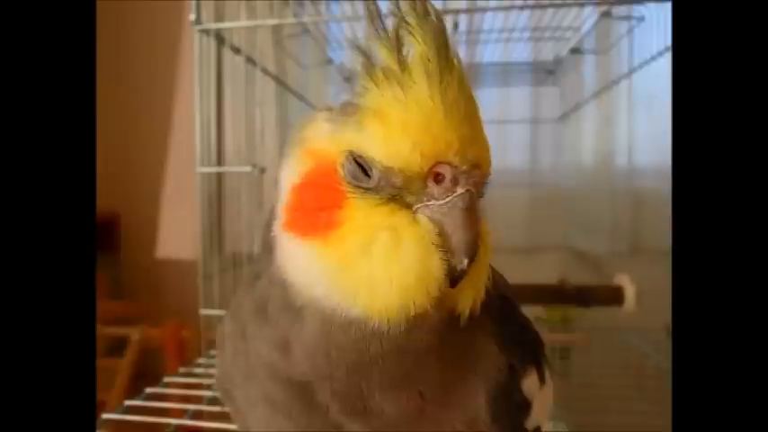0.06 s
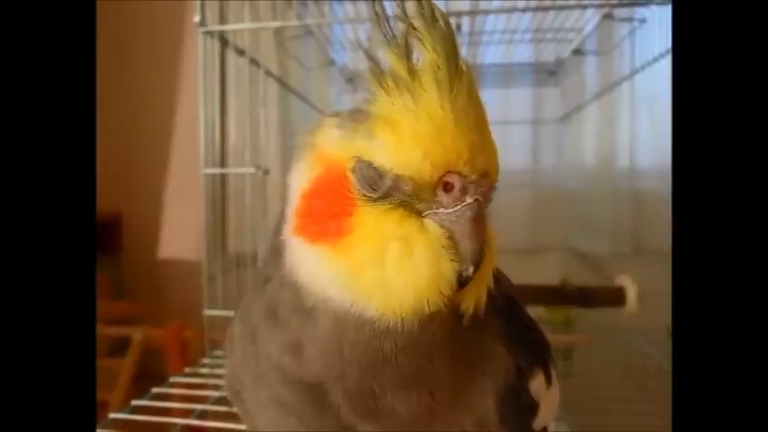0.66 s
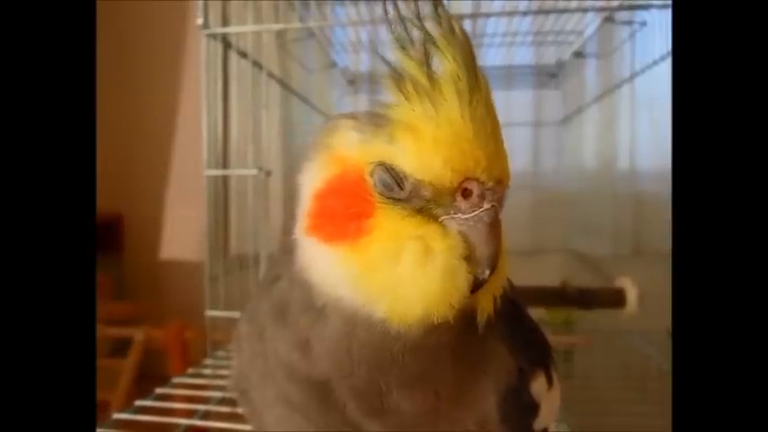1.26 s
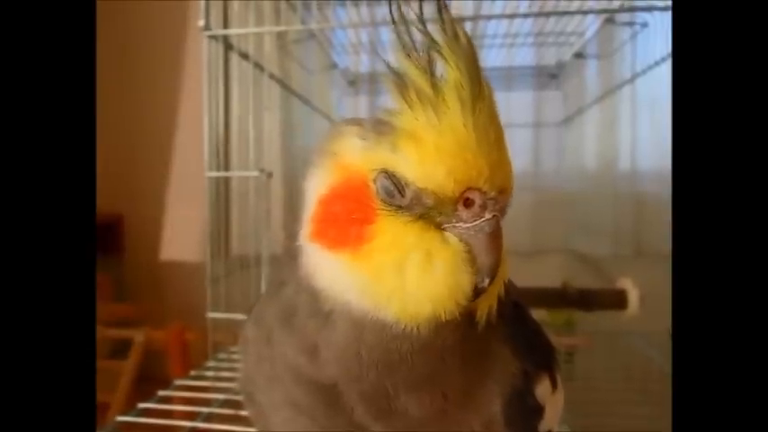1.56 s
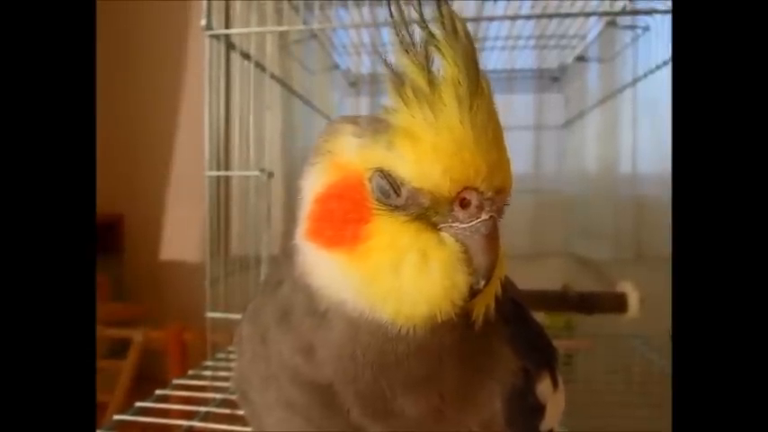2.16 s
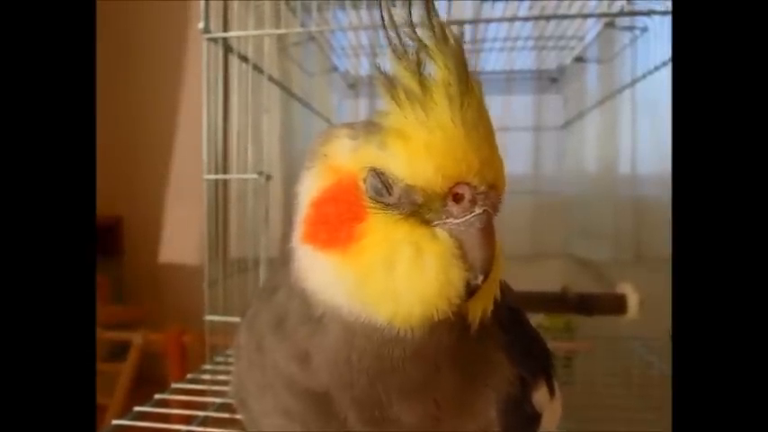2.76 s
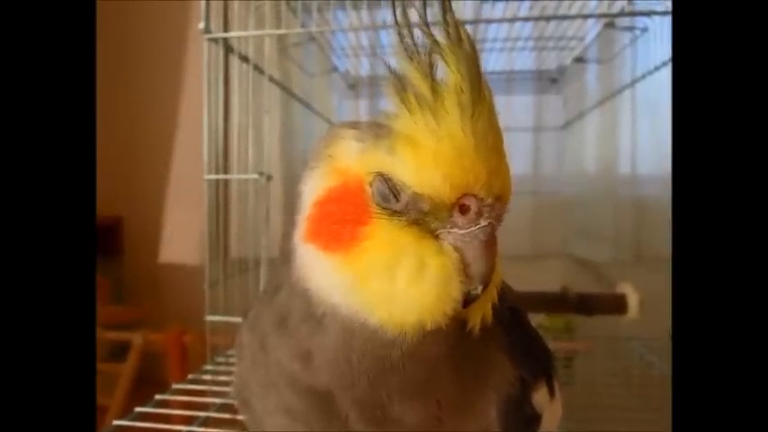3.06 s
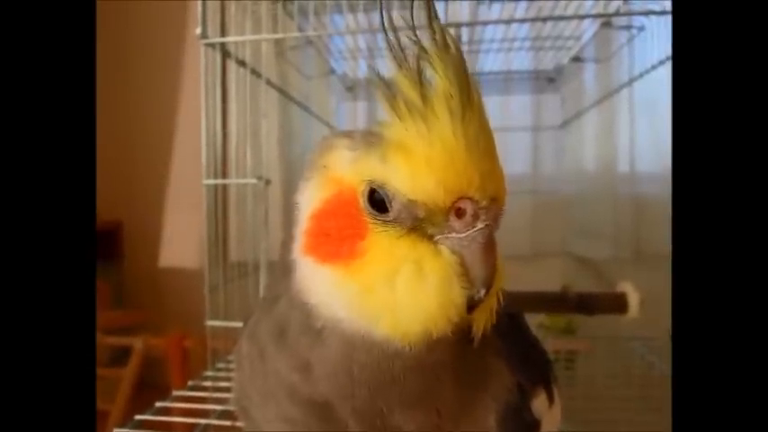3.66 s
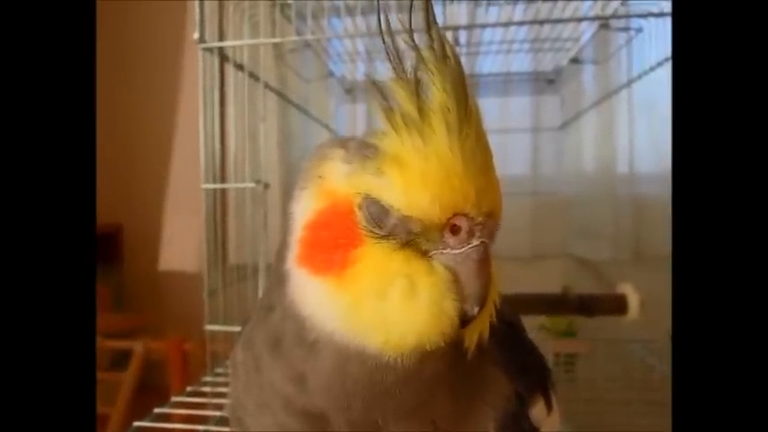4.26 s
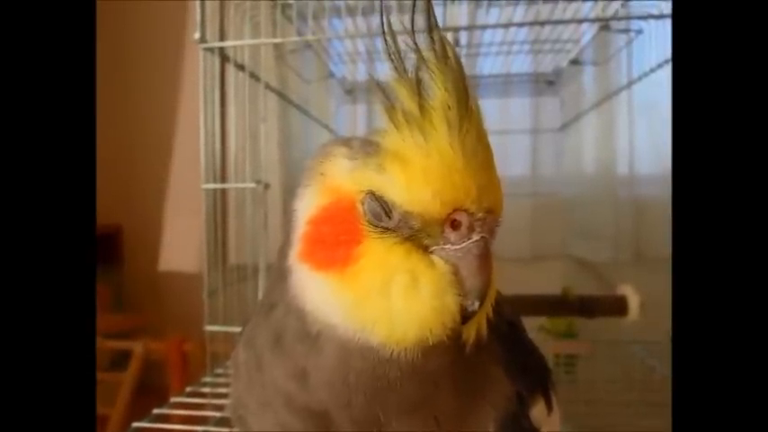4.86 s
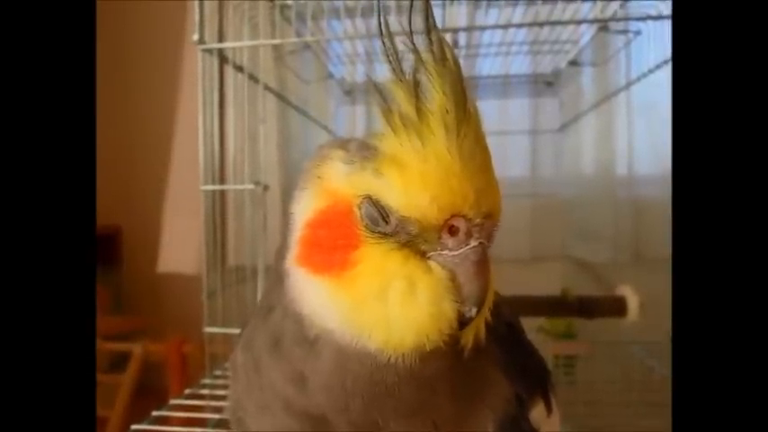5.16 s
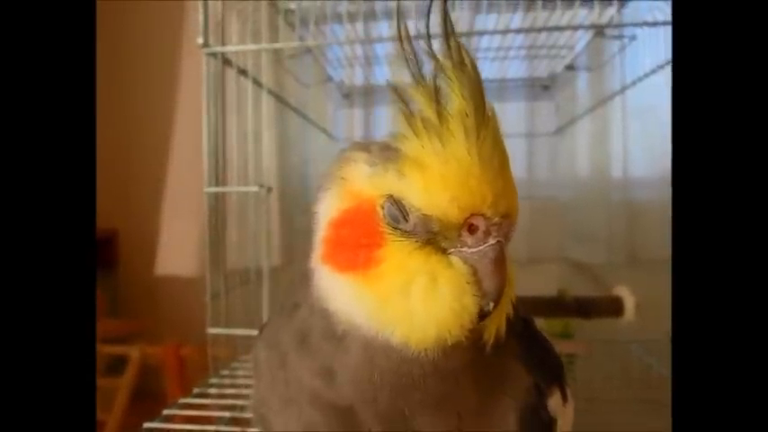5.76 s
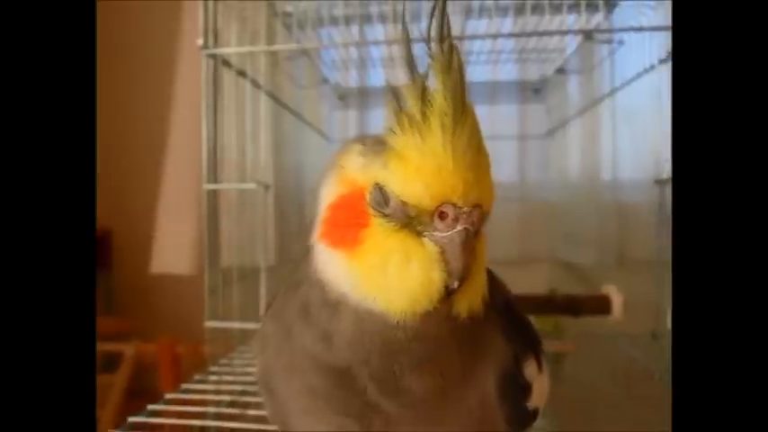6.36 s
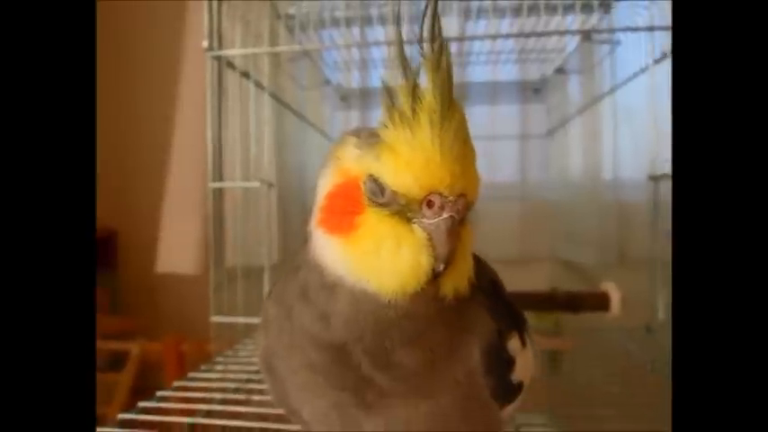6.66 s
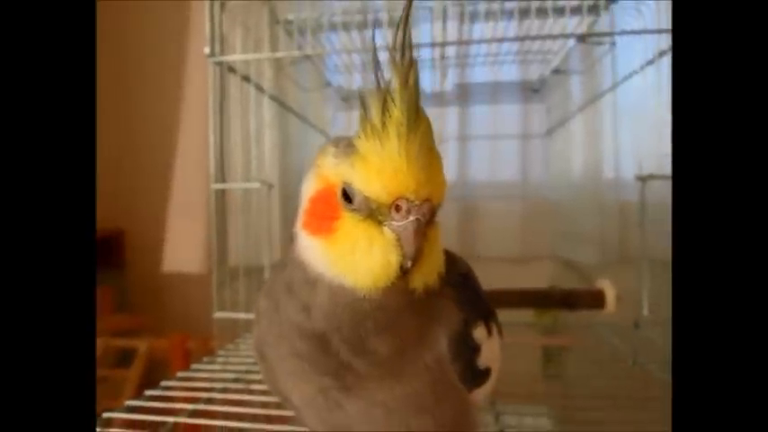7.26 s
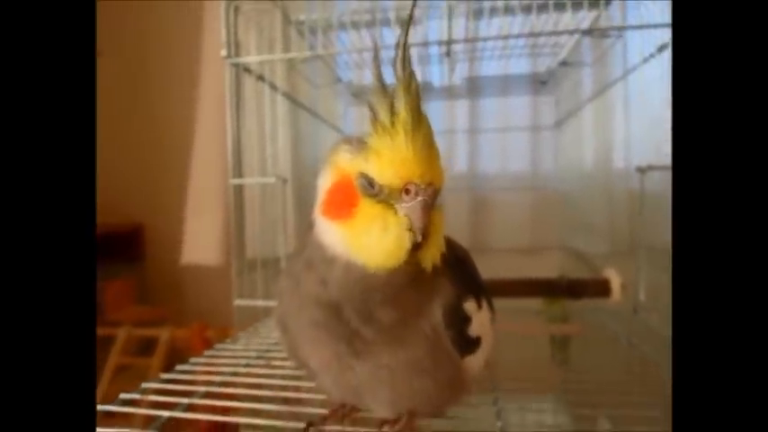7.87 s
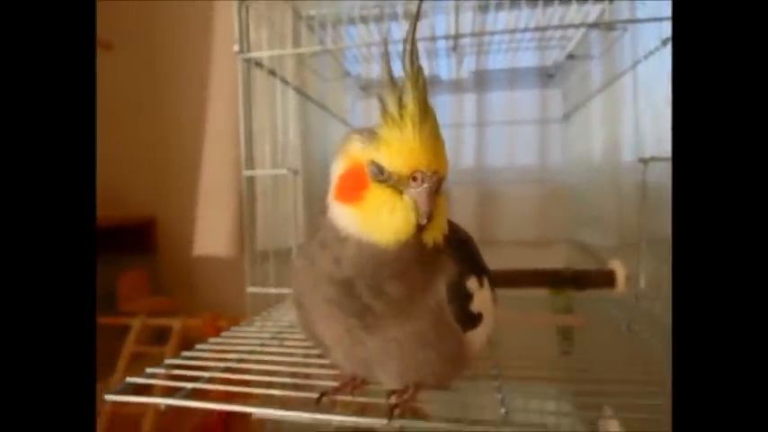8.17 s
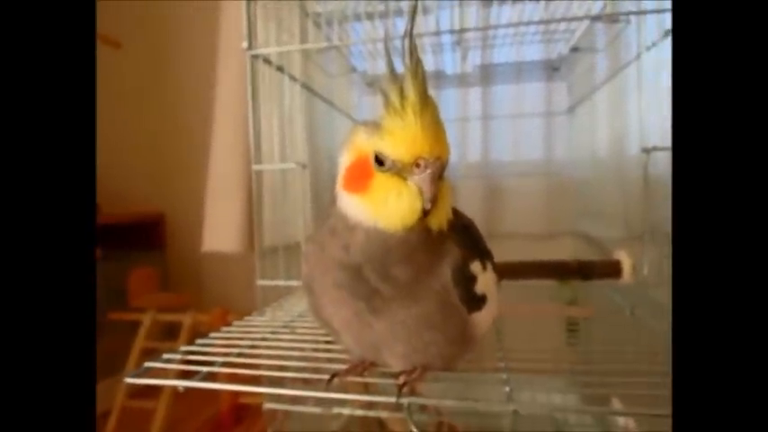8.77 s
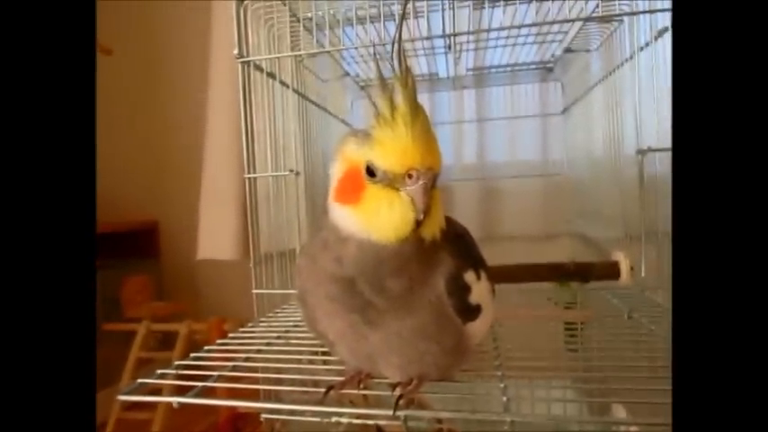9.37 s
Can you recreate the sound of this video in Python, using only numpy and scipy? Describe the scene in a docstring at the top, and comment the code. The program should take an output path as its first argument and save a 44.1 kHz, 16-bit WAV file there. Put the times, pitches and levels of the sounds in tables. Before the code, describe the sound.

A cockatiel grinds its beak in faint, dry, irregular clicks over steady quiet room noise, with a few light handling ticks.

```python
"""A cockatiel grinding its beak

A drowsy cockatiel sits a hand's length from a small hand-held camera in a quiet room. Its lower bill
slips off the ridges of the upper one in dry clicks, with a faint rasp of rubbing around them. A near
wall and the room echo the sound. The grip makes the camera's casing tick and bump now and then,
over rumbling air, a faint fan whine and microphone hiss."""
import sys
import numpy as np
from scipy import signal
from scipy.fft import rfft, irfft
from scipy.io import wavfile

SR = 44100
rng = np.random.default_rng(int(sys.argv[2]) if len(sys.argv) > 2 else 0)


def bounce(signal):
    """Save signal as a 16-bit WAV file at the path given by the first command-line argument."""
    frames = np.transpose(np.atleast_2d(signal))
    limited = np.clip(frames, -1, 1)
    pcm = np.round(limited * 32767).astype(np.int16)
    wavfile.write(sys.argv[1], SR, pcm)


N = 420273

# times when the two halves of the bill rub together: start_s, length_s, level_db
BILL_RUBS = [(0.623, 0.57, -66), (1.413, 0.3, -62.5), (2.961, 0.32, -62.5), (3.196, .21, -56),
             (4.273, .08, -61.5), (7.783, 0.56, -63), (8.813, 0.061, -57.5)]


def beak(skid_s=0.0024, skid_db=-48.5, faint_per_s=8, over_rub_db=11, scatter_db=2):
    """The bill slips off a ridge and skids over the next; rubbing adds faint slips at random."""
    # clear slips: start_s, level_db, low_hz, high_hz, sharpness_db
    clear_slips = [(1.0935, -40, 2000, 5500, 0), (1.552, -49, 3800, 6800, -12),
                   (3.1030, -38.5, 3000, 5600, -4), (3.2010, -44, 1600, 2700, -18),
                   (3.2093, -38, 1780, 4130, -7), (3.2528, -18.5, 3250, 6500, -15),
                   (3.2806, -16.5, 2930, 5600, 1), (3.354, -26.5, 1740, 3200, -3),
                   (3.3807, -28.5, 1920, 4670, 1), (3.4733, -40.5, 1700, 3900, 4),
                   (4.6146, -43, 1760, 2110, -11), (7.97, -44, 3200, 4900, -2),
                   (8.0698, -42, 3200, 5000, -7), (8.247, -40.5, 2480, 4570, -4),
                   (8.4584, -37, 4050, 6200, -10)]
    out = np.zeros(N)
    for start_s, level_db, *contact in clear_slips:
        add(out, start_s, slip(level_db, *contact))
        add(out, start_s + skid_s, slip(skid_db, *contact))
    for start_s, length_s, rub_db in BILL_RUBS:
        count = round(faint_per_s * length_s)
        for when, size, place in rng.uniform(-1.1, 1, size=(count, 3)):
            pitch = 2 ** (0.33 * place)  # up to about a third of an octave either way
            level_db = rub_db + over_rub_db + scatter_db * size
            faint = slip(level_db, low_hz=2400 * pitch, high_hz=4600 * pitch, sharpness_db=0)
            add(out, start_s + length_s * (1 + when) / 2, faint)
    return out


def slip(level_db, low_hz, high_hz, sharpness_db, catch_s=0.00032, catch_db=-13):
    """One push makes the horn of the beak ring very briefly; where it touches sets the two pitches."""
    low = ping(low_hz, cycles=0.38)
    high = gain(0.48 * sharpness_db) * ping(high_hz, cycles=0.88)  # sharper slips drive it harder
    crack = gain(sharpness_db) * ping(hz=11800, cycles=0.63)
    click = low - high + crack  # neighbouring vibrations move in opposite directions
    out = gain(catch_db) * click  # the bill gives a little just before it lets go
    add(out, catch_s, click)
    thin = cut(out, 1100, "high", order=3)  # so small a body gives off little bass
    return at_level(thin, level_db)


def rasp(clicks_per_s=2200, spread_db=2.0, low_hz=1200, high_hz=5000):
    """Rubbing horn makes a crowd of tiny clicks that swells and fades."""
    hits = rng.random(N) < clicks_per_s / SR
    signs = rng.choice([-1, 1], N)
    sizes = gain(spread_db * np.minimum(rng.exponential(size=N), 3))
    clicks = cut(hits * signs * sizes, low_hz, "high")
    clicks = cut(clicks, high_hz, "low", order=1)
    loudness = np.zeros(N)
    for start_s, length_s, level_db in BILL_RUBS:
        add(loudness, start_s, gain(level_db) * signal.windows.tukey(int(length_s * SR), 0.7))
    return loudness * clicks / clicks.std()


def room(sound, near_s=0.0018, wall_s=0.011, smear_s=0.003, fade_s=0.3):
    """Sound scatters around the camera, bounces off a near wall and dies away in the room."""
    t = np.arange(SR // 2) / SR
    near, wall, tail = rng.standard_normal((3, 2, len(t)))
    near = cut(near, 5400, "high", order=1) * t * np.exp(-t / near_s)
    wall = cut(wall, 4000, "high", order=1) * np.exp(-np.abs(t - wall_s) / smear_s)
    tail = tail * np.minimum(t / wall_s, 1) * fade(t, fade_s)
    echoes = gain(-14) * unit(near) + gain(-10.5) * unit(wall) + gain(-16) * unit(tail)
    echoes = cut(echoes, 14000, "low", order=1)
    return signal.fftconvolve(sound[None], echoes, axes=1)[:, :N]


def casing(rise_s=0.00054, mic_gap_s=0.00006):
    """The grip strains the camera's shell: it cracks, rings for a moment, and bumps softly."""
    # ticks of the shell: start_s, level_db, tilt_db_per_octave, crack_hz, crack_db
    ticks = [(2.1147, -35, 1.5, 6500, -4.5), (4.1836, -37.5, 1, 5530, -8), (5.9526, -37.5, 3.5, 6500, -7),
             (6.7534, -45, 1.5, 5000, -4), (9.165, -28.5, -10, 2930, -3.5)]
    # tones the shell rings with: pitch_hz, relative_db, fade_s
    shell_tones = [(1730, -1.5, 0.019), (1970, -3.5, 0.013), (2325, -1, 0.014), (4810, 4, 0.0086),
                   (7140, 0, 0.0044), (12000, -2, .003)]
    # soft bumps of the grip: start_s, level_db, pitch_hz
    bumps = [(0.906, -47, 900), (4.301, -43, 447), (4.386, -50, 1000)]
    out = np.zeros((2, N))
    t = np.arange(SR // 20) / SR
    for start_s, level_db, tilt, crack_hz, crack_db in ticks:
        ringing = 0
        for k, (hz, tone_db, fade_s) in enumerate(shell_tones):
            # each tone reaches one microphone first
            lead_s = (-1) ** k * mic_gap_s * np.array([[1], [-1]]) / 2
            size = gain(tone_db + tilt * np.log2(hz / shell_tones[0][0]))
            ringing += size * np.sin(2 * np.pi * hz * (t + lead_s)) * fade(t, fade_s)
        ringing *= np.minimum(t / rise_s, 1)
        tick = unit(cut(ringing, 1350, "high"))
        add(tick, 0, gain(crack_db) * ping(crack_hz, cycles=0.54))
        add(out, start_s, at_level(tick, level_db))
    for start_s, level_db, hz in bumps:
        add(out, start_s, at_level(ping(hz, cycles=0.62), level_db))
    return out


def air(level_db=-50.5, right_db=0.8, room_hz=2500, rumble_hz=120, swell_db=0.3):
    """Both microphones hear the same slowly swelling rumble; each adds its own steady hiss."""
    # strength of the rumble and hiss: pitch_hz, relative_db
    noise_shape = [(12, -22.5), (26, 1.5), (42, -4.5), (65, -4.5), (110, -9), (240, -11.5), (480, -14),
                   (750, -16.5), (1400, -18.5), (2300, -20.5), (3800, -23), (4800, -23), (6500, -25.5),
                   (14000, -27)]
    # how alike left and right are: pitch_hz, likeness (1 means the same)
    likeness = [(25, 1), (60, .78), (125, 0.67), (250, 0.23), (1000, 0.21), (2500, 0.023), (6000, 0.019),
                (14000, 0.016)]
    hz = np.arange(N // 2 + 1) * SR / N
    alike = read_curve(likeness, hz)
    spectrum = rfft(rng.standard_normal((2, N))) * gain(read_curve(noise_shape, hz))
    shared, opposite = spectrum * np.sqrt([1 + alike, 1 - alike])
    lean = gain(right_db / 2 / (1 + (hz / room_hz) ** 2))  # the room's share leans a little right
    noise = irfft(np.array([(shared + opposite) / lean, (shared - opposite) * lean]), N)
    noise /= noise.std()
    rumble = cut(noise, rumble_hz, "low", order=1)
    swell = gain(swell_db * drift(turns_per_s=0.9))
    return gain(level_db) * (noise + (swell - 1) * rumble)


def fan(waver_db=1, shared=0.81):
    """Swirling air rings at a few pitches and makes a faint, wavering whine."""
    # tones of the whine: pitch_hz, rough_width_hz, left_db, right_db
    fan_tones = [(1081, 16, -69, -65), (1051, 33, -71, -67.5), (931, 37, -70, -67.5), (854, 44, -76, -69.5),
                 (1660, 110, -89, -76)]
    out = 0
    for hz, width_hz, left_db, right_db in fan_tones:
        flow = rng.standard_normal((2, N)) + shared * rng.standard_normal(N)
        peak = signal.iirpeak(hz, hz / width_hz / 2, fs=SR)
        tone = signal.lfilter(*peak, signal.lfilter(*peak, flow))
        out += gain([[left_db], [right_db]]) * tone / tone.std()
    return out * gain(waver_db * drift(turns_per_s=2.3))


def ping(hz, cycles):
    """A tiny tone that peaks after this many cycles and dies nearly as fast."""
    turns = hz * np.arange(SR // 100) / SR
    return unit(np.sin(2 * np.pi * turns) * turns ** 2 * np.exp(-2 * turns / cycles))


def fade(t, fade_s):
    """Die away by 60 decibels in fade_s seconds."""
    return np.exp(-np.log(1000) * t / fade_s)


def gain(db):
    """Turn decibels into a number to multiply by."""
    return 10 ** (np.asarray(db) / 20)


def unit(sound):
    """Scale to an average energy of one per channel."""
    return sound / np.sqrt(np.mean(np.sum(sound ** 2, axis=-1)))


def at_level(sound, db):
    """Give a short sound the energy of one millisecond at this level."""
    return unit(sound) * gain(db) * np.sqrt(SR / 1000)


def add(out, start_s, sound):
    """Mix a short sound in at its start time."""
    i = int(start_s * SR)
    out[..., i:i + sound.shape[-1]] += sound[..., :out.shape[-1] - i]


def cut(sound, hz, keep, order=2):
    """Keep the "high" or "low" side of hz; a higher order cuts more steeply."""
    return signal.sosfilt(signal.butter(order, hz, keep, fs=SR, output="sos"), sound)


def read_curve(points, hz):
    """Read between (pitch_hz, value) points, with octaves evenly spaced."""
    pitches, values = np.transpose(points)
    return np.interp(np.log(hz + 1), np.log(pitches), values)


def drift(turns_per_s):
    """A slow random wander, mostly between -1 and 1."""
    count = int(turns_per_s * N / SR) + 2
    return np.interp(np.linspace(0, count - 1, N), np.arange(count), rng.standard_normal(count))


def scene(bird_right_db=1.4):
    """The bird sits just right of centre, with its echoes and the quiet background around it."""
    bird = beak() + rasp()
    balance = gain(np.array([[-bird_right_db], [bird_right_db]]) / 2)
    return bird * balance + room(bird) + casing() + air() + fan()


def record(dry, top_hz=14200):
    """The camera steeply cuts the highest treble."""
    return signal.fftconvolve(dry, signal.firwin(255, top_hz, fs=SR)[None], mode="same", axes=1)


dry = scene()
out = record(dry)
bounce(out)
```